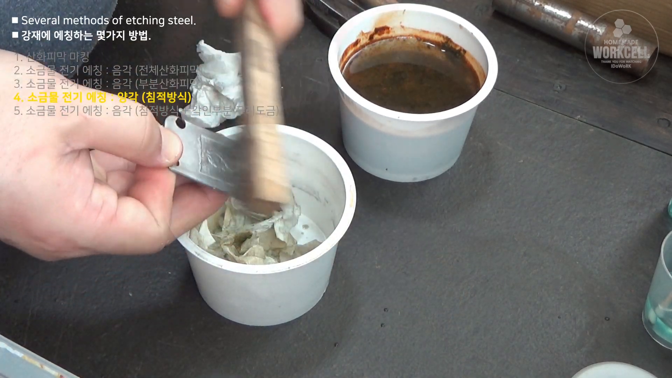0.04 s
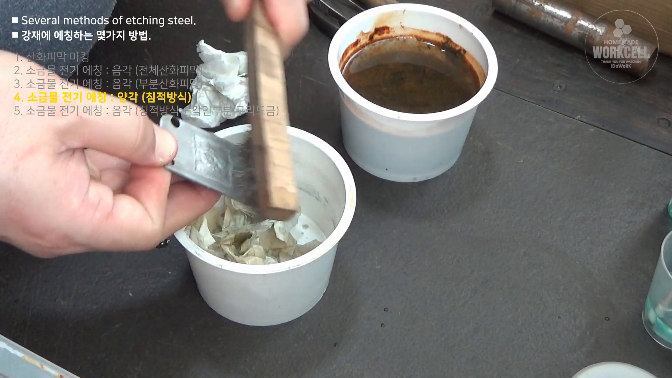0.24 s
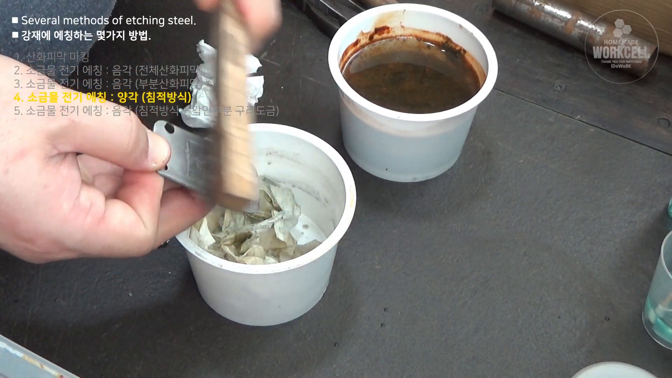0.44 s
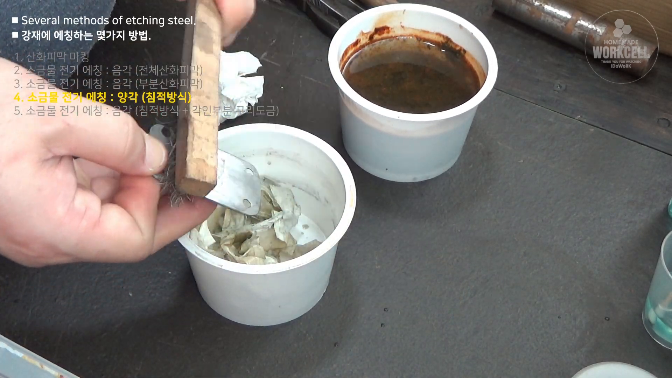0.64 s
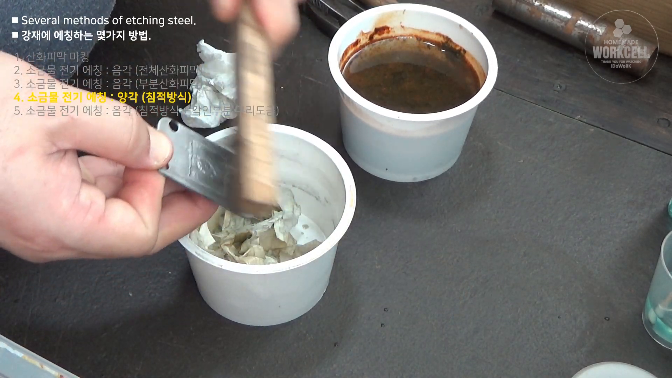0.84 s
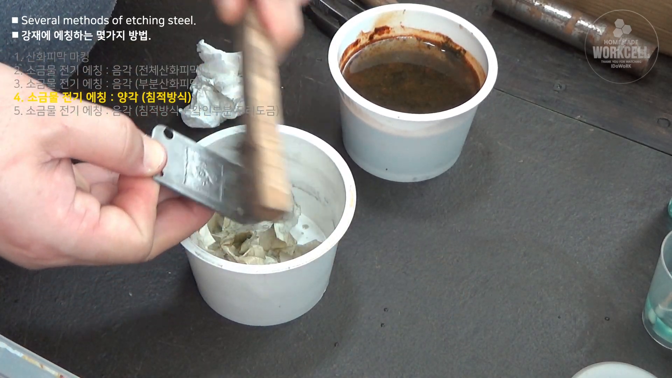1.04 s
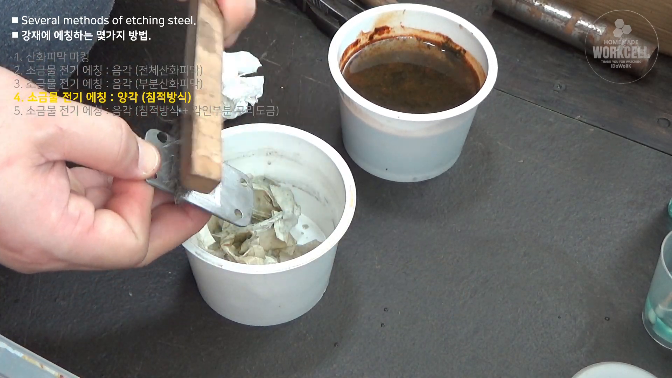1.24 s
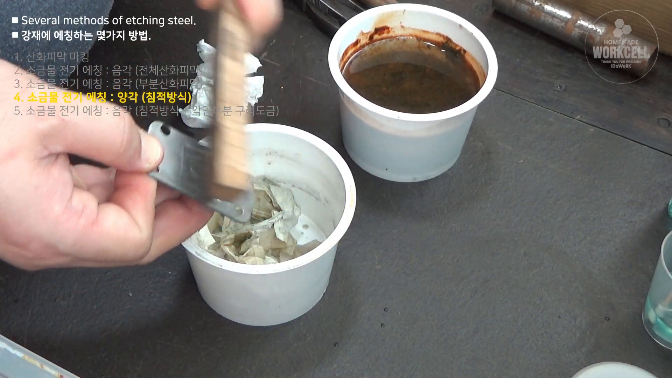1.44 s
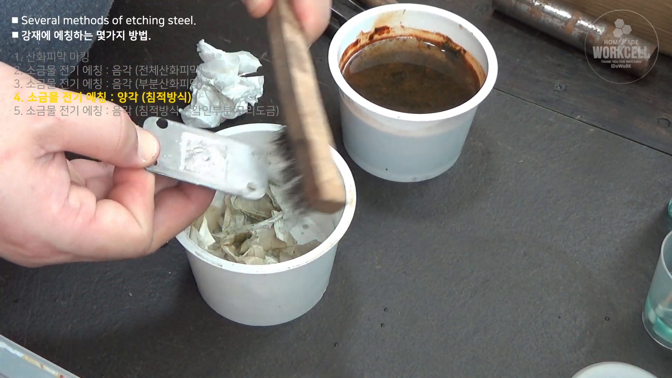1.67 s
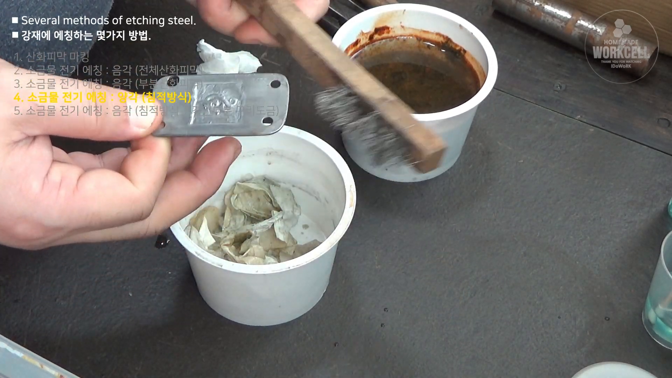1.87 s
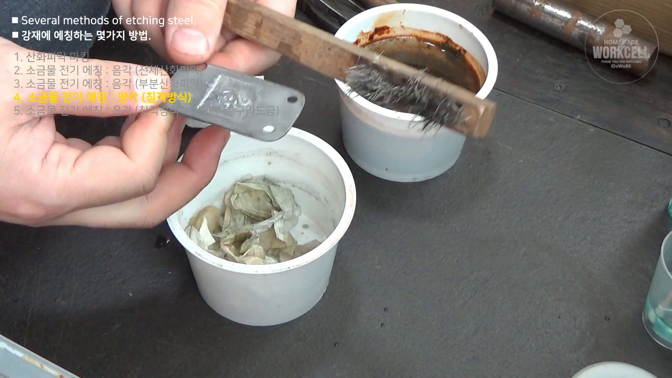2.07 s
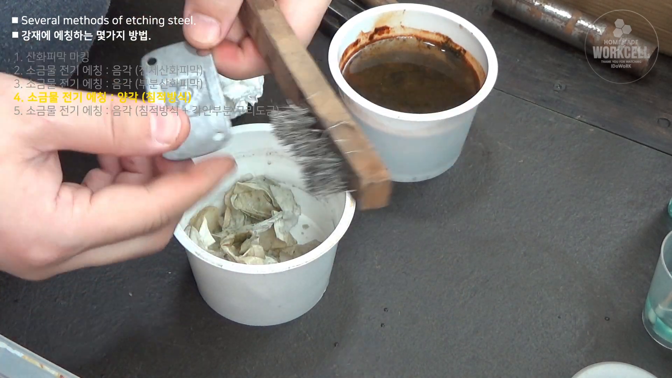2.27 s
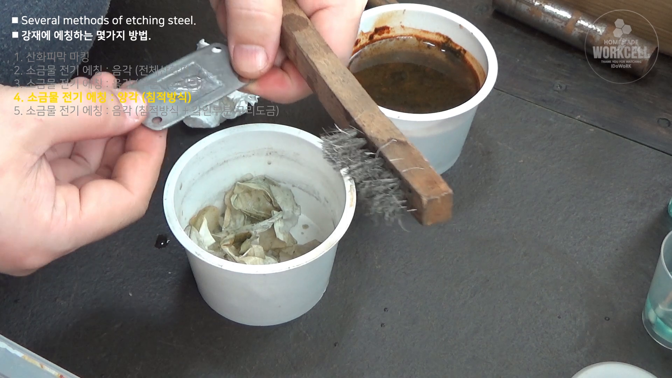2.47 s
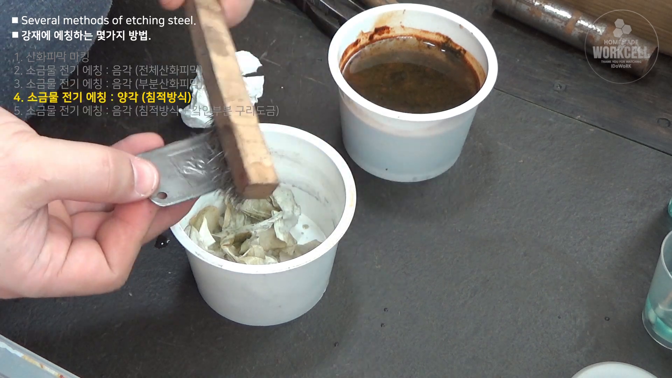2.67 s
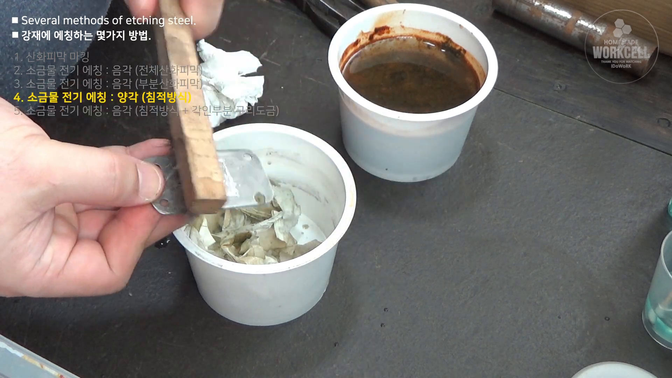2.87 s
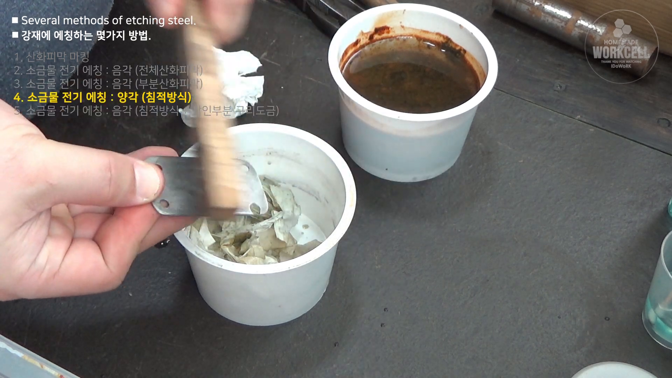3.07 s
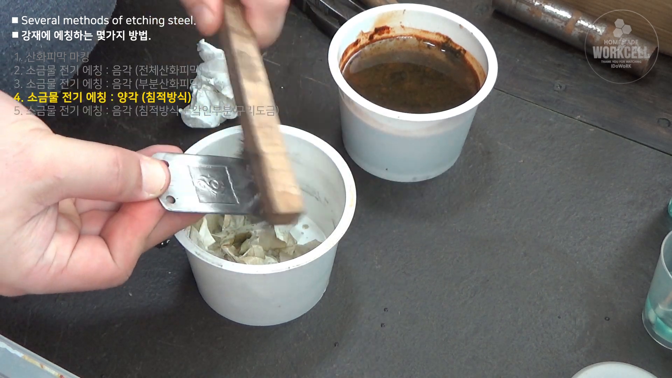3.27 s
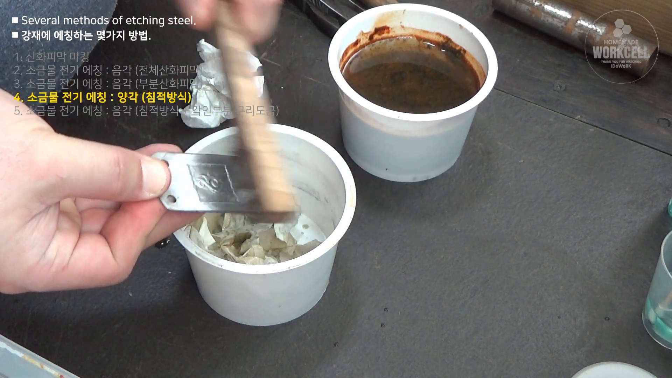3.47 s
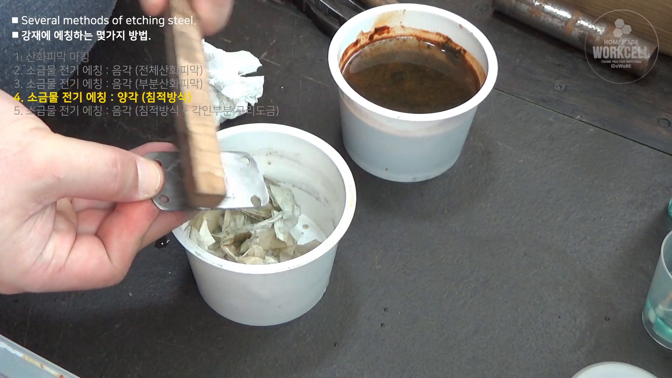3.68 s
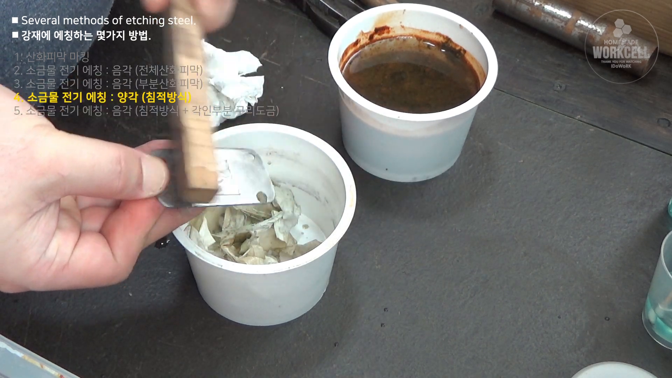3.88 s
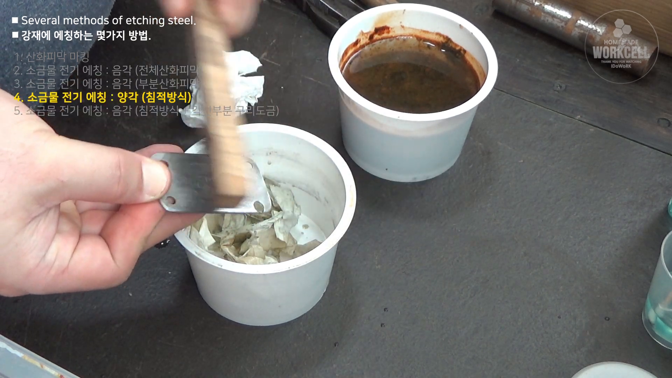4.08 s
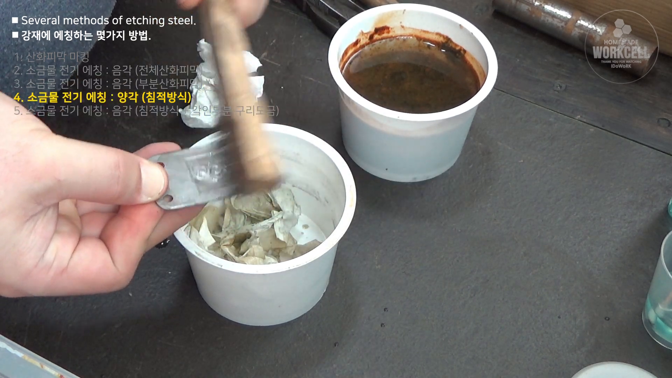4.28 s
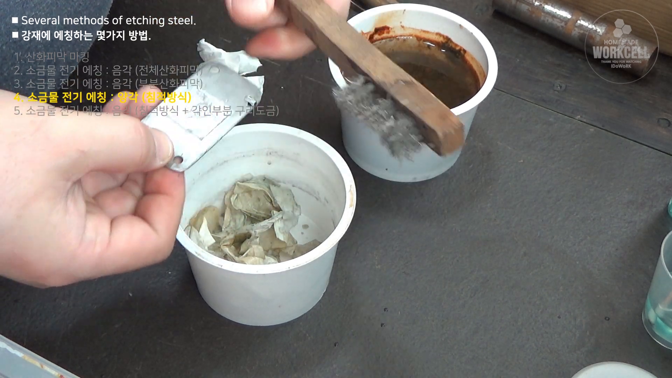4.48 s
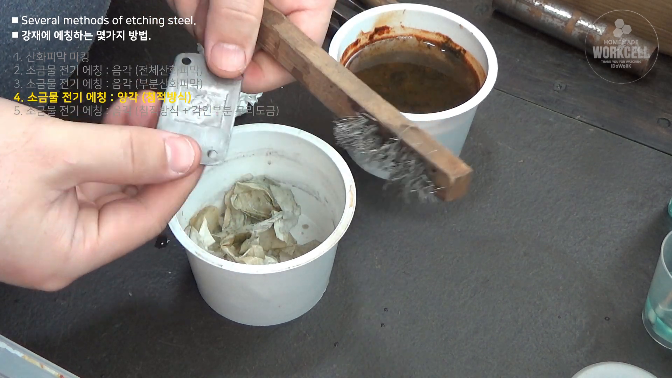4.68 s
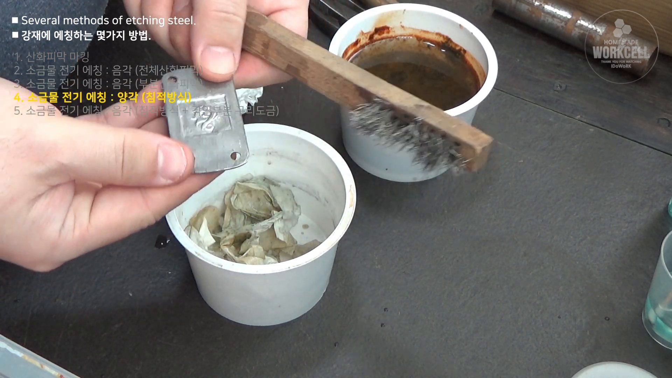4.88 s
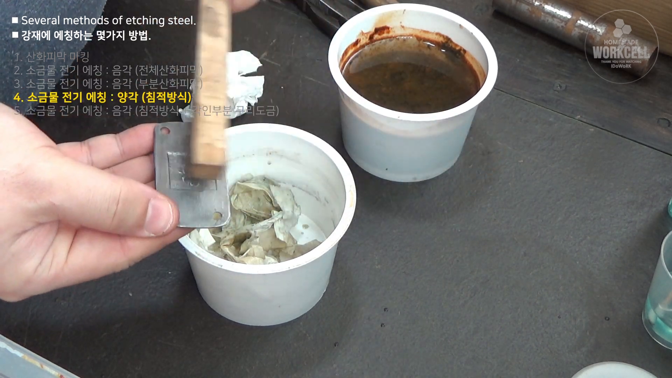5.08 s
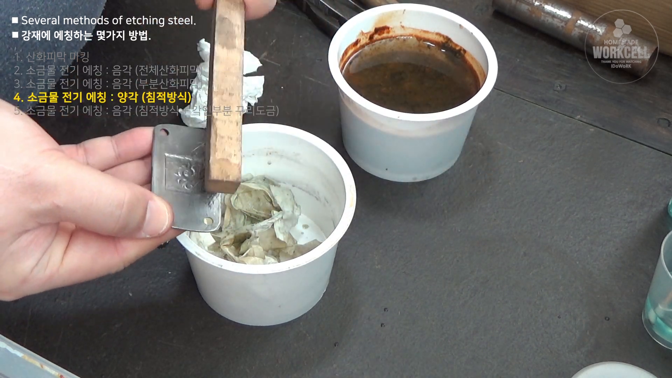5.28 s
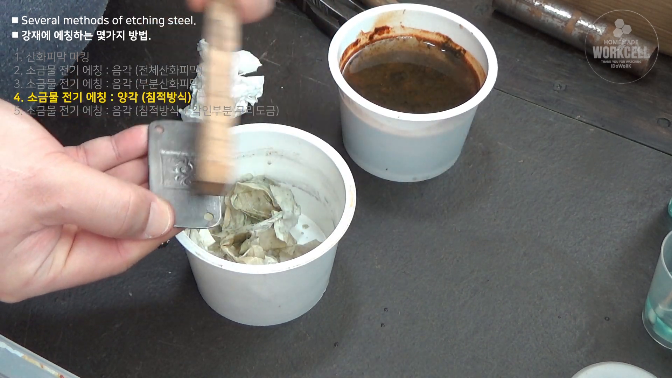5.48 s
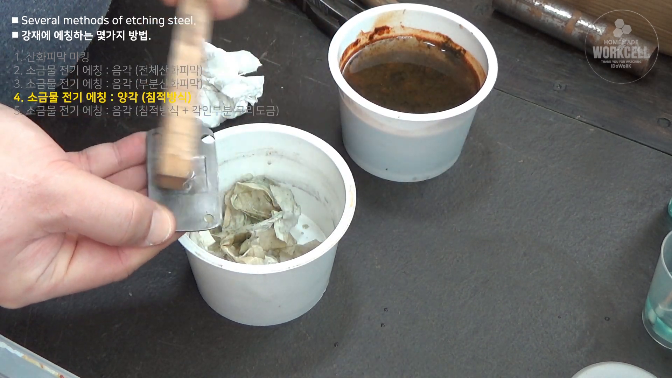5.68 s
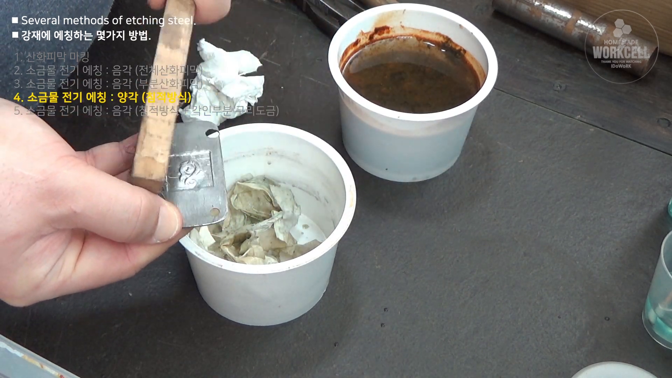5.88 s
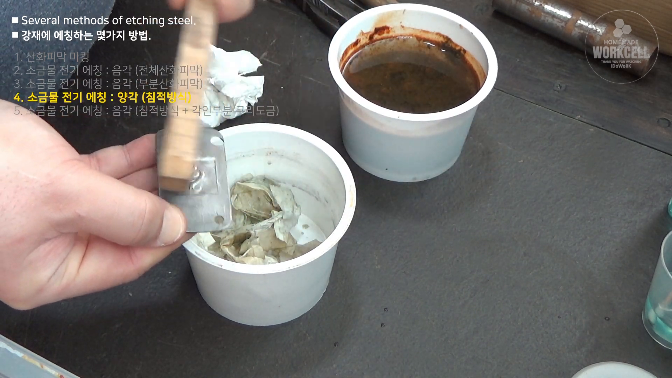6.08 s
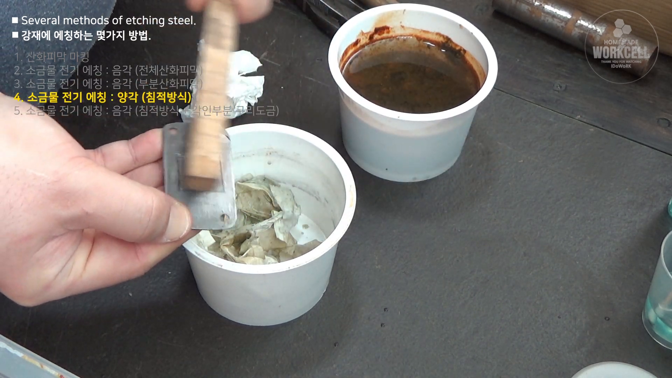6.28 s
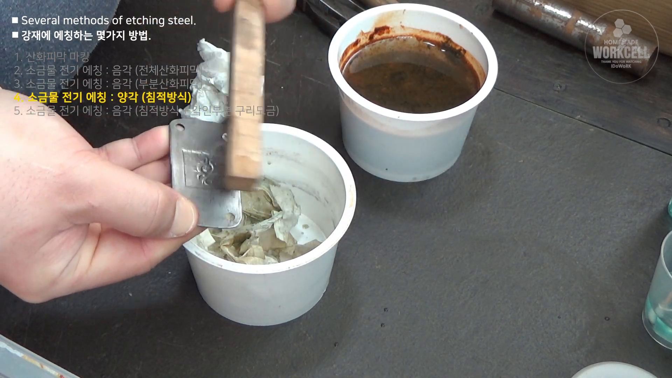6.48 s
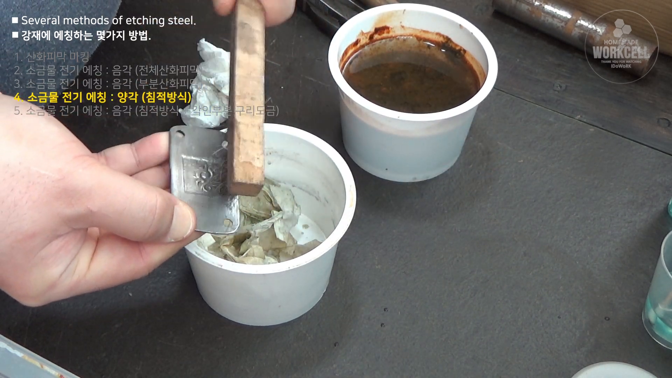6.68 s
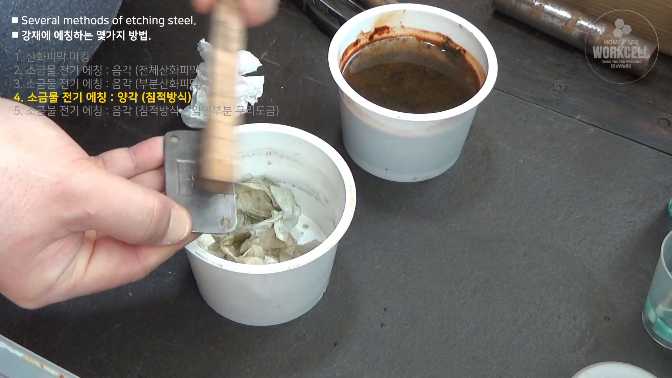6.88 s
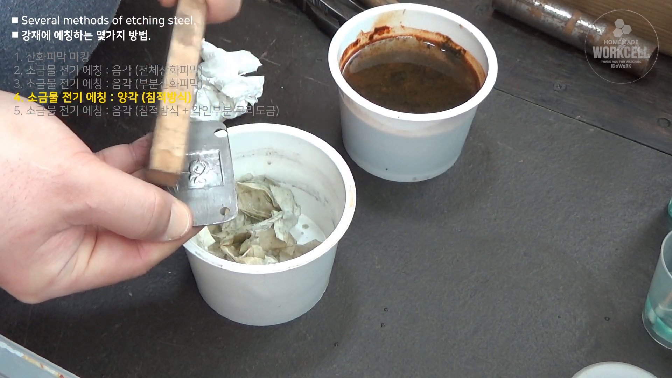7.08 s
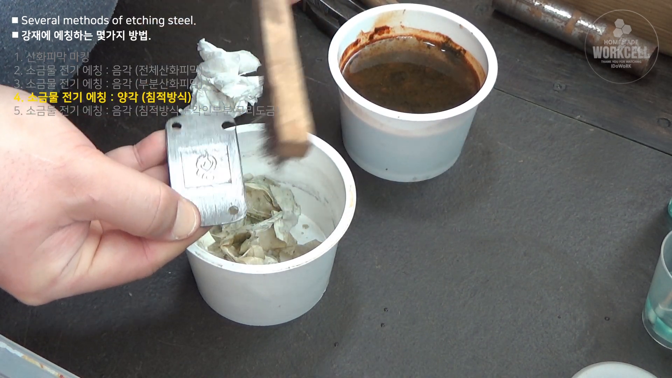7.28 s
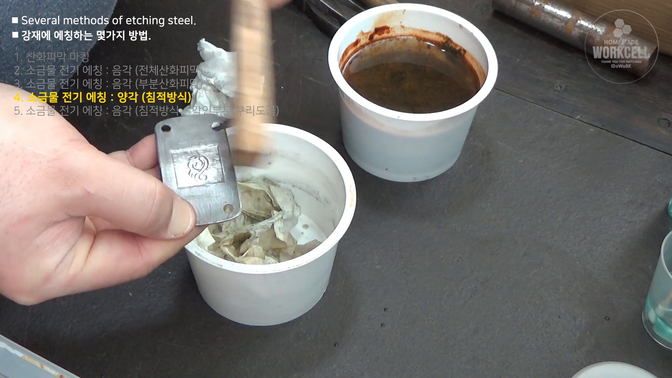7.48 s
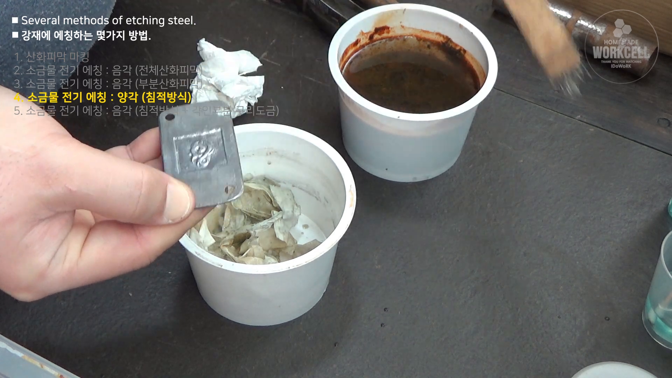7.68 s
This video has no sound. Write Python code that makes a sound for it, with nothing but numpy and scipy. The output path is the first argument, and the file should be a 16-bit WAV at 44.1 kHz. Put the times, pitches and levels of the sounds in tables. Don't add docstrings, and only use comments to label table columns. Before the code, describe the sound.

A wire brush scrubs a small hand-held steel plate in three bouts of fast, bright, scratchy strokes, then two single flicks, over faint fan hum.

```python
import sys
import numpy as np
from scipy import signal
from scipy.io import wavfile
from scipy.ndimage import uniform_filter1d

SR = 44100
rng = np.random.default_rng(int(sys.argv[2]) if len(sys.argv) > 2 else 0)


def ratio(d):
    e = np.asarray(d, float) / 20
    return 10 ** e


def bounce(signal):
    frames = np.transpose(np.atleast_2d(signal))
    limited = np.clip(frames, -1, 1)
    pcm = np.round(limited * 32767).astype(np.int16)
    wavfile.write(sys.argv[1], SR, pcm)


N = 340967
TIME = np.arange(N) / SR

GRIP_CHANGES_S = (2.3, 4.7)
# [start_s, length_s, level_db, swell_db, dull_db]
BOUT_1 = [(0.007, 0.043, -34.5, 11, 0), (0.071, 0.0378, -32.5, 0, -1.0), (0.1317, 0.038, -31, -3.5, -1),
          (0.187, 0.038, -34, 2, 2), (0.253, 0.027, -31.5, -1, 0.5), (0.301, 0.035, -33, 8, 2),
          (0.3645, 0.027, -29.5, -5, 0.5), (0.412, 0.037, -33.5, 1, 1.5), (0.4756, 0.032, -32.5, -5, 0),
          (0.5234, 0.045, -33, 2, 1), (0.59, 0.03, -30, -7.5, -0.5), (0.64, 0.035, -30.5, 1, -0.5),
          (0.7016, 0.036, -32, -10, 2), (0.753, 0.042, -32, 3, 0), (0.818, 0.033, -30.5, -5, 1),
          (0.8694, 0.044, -33, 2, 1.5), (0.9344, 0.033, -32, -3, 0.5), (0.985, 0.039, -31.5, 11, -0.5),
          (1.051, 0.036, -31.5, -9.0, 0), (1.103, 0.039, -33.5, 4, 0.5), (1.1676, 0.04, -33.5, -10, 1),
          (1.224, 0.044, -34.5, 3, 2.5), (1.2893, 0.033, -30.5, -7, -0.5), (1.342, 0.039, -33.5, 0, 3),
          (1.404, 0.035, -30, -2, 1.5), (1.458, 0.038, -32, 5, 0.5), (1.524, 0.035, -31.5, -11, 0),
          (1.576, 0.036, -31.5, -3, 2.5)]
BOUT_2 = [(2.7492, 0.034, -37, 5, 2), (2.8235, 0.041, -34.5, -8, 0), (2.8735, 0.034, -35, -4, 4),
          (2.925, 0.038, -35, -3, -3), (2.9775, 0.037, -39, 9, 2), (3.0371, 0.042, -33.5, 2, 0.5),
          (3.0964, 0.043, -34.5, -5, 2), (3.1557, 0.037, -32.5, 3.5, 0), (3.2141, 0.035, -33.5, -6, 2.5),
          (3.2654, 0.039, -31, 7, 0.5), (3.3221, 0.041, -32.5, -6, 0.5), (3.3804, 0.039, -33.5, -3, 0),
          (3.4401, 0.039, -34.5, -3, 0.5), (3.494, 0.039, -32.5, 0.0, -1),
          (3.5516, 0.038, -32.5, -5.5, 1.5), (3.6058, 0.039, -31, 5.5, 0),
          (3.6622, 0.036, -33.5, -5.5, 1.5), (3.7119, 0.044, -32, 6.5, -0.5), (3.7714, 0.035, -32, 1, 2),
          (3.8187, 0.045, -33.5, 10, -1.5), (3.883, 0.038, -32, -5, -1), (3.9374, 0.036, -31.5, 6.0, 1.5),
          (3.9926, 0.03, -30.5, 0, -1.5), (4.0452, 0.034, -31, 2, 1.0), (4.0959, 0.032, -30.5, 2, -2),
          (4.1521, 0.038, -32.5, -7, -4), (4.207, 0.037, -34, -12.0, -5), (4.2628, 0.047, -37.5, -12, 2)]
BOUT_3 = [(5.1237, 0.025, -33.5, 4, 1.5), (5.179, 0.027, -35.5, 0, 1), (5.2311, 0.027, -32.5, 5, -5),
          (5.2758, 0.028, -36.5, 12, 1), (5.332, 0.027, -29.5, 7, 1), (5.3714, 0.042, -35.5, 10, -2),
          (5.4423, 0.026, -31, 4, 1.5), (5.4899, 0.037, -34, -1, 0.5), (5.5505, 0.031, -32, 8, 0.0),
          (5.5939, 0.035, -35, 14, -2), (5.6589, 0.032, -31.5, 10, 0), (5.721, 0.024, -32.5, -5, 0.5),
          (5.7659, 0.029, -31, 8, 3.5), (5.8078, 0.044, -33, 7, -1.5), (5.873, 0.033, -30, 10, 0.5),
          (5.922, 0.038, -36, 12, -0.5), (5.9895, 0.028, -30.5, 10, 3), (6.0307, 0.038, -34, 7, -3),
          (6.0926, 0.039, -32.5, 4, 1), (6.153, 0.029, -34, -7, 1), (6.1998, 0.033, -31, 5, 1),
          (6.243, 0.036, -33.5, 7, 0.0), (6.3108, 0.028, -31.5, 10, 2), (6.355, 0.041, -35, -2, 0.5),
          (6.4164, 0.032, -32.5, 9.0, 0.5), (6.4705, 0.036, -34, 0, 1), (6.5257, 0.033, -32.5, 10, 2.5),
          (6.5733, 0.04, -35.5, 6, 0), (6.6352, 0.033, -31.5, 9, 0.5), (6.694, 0.026, -32.8, -3, 1.5),
          (6.7457, 0.031, -30.5, 2, 1.5), (6.796, 0.029, -34, -2, 0.0), (6.8499, 0.036, -32.5, 6, 1.5),
          (6.91, 0.037, -35, -4, -1), (6.9651, 0.025, -32, 11, 2), (7.0046, 0.04, -34, 4, 0.5),
          (7.067, 0.04, -30.5, 3, 0.0), (7.1242, 0.027, -31.5, -5, 0.5), (7.179, 0.025, -30.5, 12, 0.0),
          (7.232, 0.057, -35, 9, -1.5)]
# [start_s, length_s, level_db, swell_db]
FLICKS = [
    (1.641, 0.07, -35, -25),
    (2.71, 0.01, -59, -8),
    (7.444, 0.043, -30.5, -5),
    (7.558, 0.034, -31, -1),
]
ARCH_DB = (0.5, 2, 0)
# [push_db, pull_db]
DRAG_DB = [(-18.5, -16.5), (-19.5, -20.5), (-23, -6.5)]
# [touch_s, lift_s]
CONTACT = [
    (0, 1.722),
    (2.707, 2.728),
    (2.744, 4.33),
    (5.104, 7.296),
    (7.432, 7.496),
    (7.551, 7.6),
]
# [time_s, peak_db]
CATCHES = [(0.0209, -21), (0.1371, -19), (0.1524, -19), (0.2014, -22), (0.3804, -20), (0.4728, -23),
           (0.4853, -18), (0.55, -19), (0.601, -18), (0.651, -19), (1.052, -20), (1.1814, -19),
           (1.4032, -18), (1.4845, -18), (1.6402, -18), (2.7854, -26), (2.8374, -21), (2.9317, -19),
           (2.9417, -18), (3.045, -22), (3.049, -19), (3.609, -21), (3.6651, -22), (3.716, -22),
           (3.7823, -20), (3.8214, -23), (3.9933, -20), (4.2144, -20), (5.1257, -23), (5.1642, -24),
           (5.1876, -23), (5.2804, -21), (5.3413, -18), (5.3847, -21), (5.4311, -24), (5.4694, -24),
           (5.5608, -21), (5.8364, -20), (5.9084, -19), (5.9325, -20), (6.0325, -23), (6.158, -19),
           (6.232, -19), (6.323, -21), (6.2148, -19), (6.4298, -20), (6.4454, -21), (6.6644, -19),
           (6.8089, -20), (6.8794, -21), (6.9217, -21), (6.9735, -20), (6.9864, -22), (7.0974, -21),
           (7.1277, -19), (7.1891, -20), (7.2104, -20), (7.2884, -21), (7.452, -19), (7.4704, -20),
           (7.5697, -19)]
# [freq_hz, density_db_per_hz]
SCRAPE = [
    [(2500, -31), (3300, -28), (4500, -22), (5300, -16.5), (7500, -14), (9000, -5), (11500, -1.5),
     (13600, -3), (14800, 17), (16000, -15)],
    [(2500, -25), (3300, -27.5), (4200, -13), (5000, -24), (7000, -9), (9000, -3), (11500, -10),
     (13600, -2.5), (14800, 0), (16000, -5)],
    [(2500, -29.5), (3300, -22.5), (4400, -20), (5200, -16), (8300, -20), (9500, -7), (11500, -1.5),
     (13600, -16), (14800, -10), (16000, -5)],
]
# [freq_hz, width_hz, level_db]
PLATE = [
    [(5246, 170, -12.5), (6970, 150, -12), (9700, 190, -1.5), (11000, 760, -3.5), (12574, 290, 8.5),
     (12770, 400, 6.5)],
    [(5210, 430, -18), (6150, 130, -9), (8440, 200, -27), (9770, 250, 1), (11140, 820, 0), (12670, 260, 8),
     (13060, 330, -8)],
    [(5120, 97, -13.5), (6400, 660, -17), (7630, 530, -14.5), (9970, 940, -5.5), (12400, 300, 0),
     (12610, 260, -0.5), (12730, 330, -8), (14000, 400, -5)],
]
DULL_DB = (-8.5, -10, -12)
RING_DB = (-7.5, -10.5, 2.5)
THRUM_DB = (-21.5, -23, -20.5)
# [time_s, favour_db]
PLACE = [(0, 0.5), (.4, 0), (.8, 2), (1.2, 3.5), (1.7, 2), (2.8, 3), (2.93, -4.5), (3.1, 0.5), (3.3, 3),
         (3.5, 3), (3.7, -0.5), (3.9, 2.5), (4.1, -0.5), (4.25, 0), (5.2, 1.5), (5.7, 0.5), (6.2, 1.0),
         (6.7, 0.5), (7.0, 1), (7.6, 1.5)]
OPEN_TOP_TOUCHES_S = (1.403, 5.105, 7.432, 7.552)
# [time_s, level_db]
ROOM = [(0.0, -51), (0.04, -56.5), (0.36, -54.5), (1.2, -56.5), (1.66, -53.5), (3.03, -58.5), (3.34, -55),
        (3.42, -61), (3.47, -56.5), (4.52, -54.5), (5.19, -56.5), (5.38, -54.5), (6.95, -56), (7.19, -54.5),
        (7.23, -59.5), (7.73, -54.5)]
# [freq_hz, density_db_per_hz]
ROOM_COLOUR = [(30, -45), (60, -62), (120, -15.5), (180, -51), (250, -4), (380, -15.5), (700, -5.5),
               (1000, -2.5), (1700, -3.5), (2750, -2.5), (3400, -10.5), (6700, -15), (16000, -24)]
# [freq_hz, width_hz, level_db]
FAN = [(254, 18.3, 1), (309, 6.3, 7), (437.3, 18.6, -0.5), (467.6, 27, 2), (578.3, 15, 4), (646, 3.6, -0.5),
       (706, 8.3, -34), (1066, 21, -1), (1673, 47, 2.5), (1837, 77, 4), (2452, 15, 2.5), (2718, 28, 1.5)]
# [freq_hz, correlation]
LIKENESS = [(60, 0.99), (130, 1.0), (290, 0.995), (640, 0.93), (1410, 0.84), (3100, 0.4), (6820, 0.55),
            (15000, 0.83)]
# [time_s, peak_db, centre_hz, spread_octaves, t60_s]
TICKS = [(1.715, -36, 10000, 0.64, 0.051), (1.724, -41, 11000, .6, .02), (1.7544, -48, 9100, 0.34, 0.034),
         (1.8078, -48, 8520, .5, 0.04), (1.8991, -46, 13000, .4, .03), (2.383, -55, 10100, .1, .04),
         (2.708, -38, 12000, 0.4, .03), (4.3405, -43, 10100, .5, 0.026), (4.4548, -51, 13100, 0.28, 0.025),
         (5.105, -28, 11580, 0.86, 0.011), (5.108, -35, 11480, .5, .06), (7.432, -31, 11000, .6, 0.045),
         (7.552, -35, 9900, 0.87, 0.098), (7.6334, -52, 11000, .7, .015), (7.7085, -44, 12000, 0.3, .03),
         (7.7214, -41, 12100, .4, .03)]
# [time_s, peak_db, centre_hz, spread_octaves, t60_s]
KNOCKS = [(2.502, -42.5, 1400, 0.4, 0.03), (2.507, -42, 1700, 0.4, 0.055), (2.85, -57, 960, .08, .15),
          (2.89, -59, 820, .05, .16), (2.92, -58, 820, .05, .12), (5.706, -48, 1100, 0.2, 0.1),
          (7.433, -50, 700, .3, .05), (7.553, -51, 700, 0.45, 0.054)]
# [time_s, peak_db, centre_hz, spread_octaves, t60_s]
GRAZES = [(2.708, -43, 12700, .02, .06), (2.718, -40, 12700, .015, .1), (2.718, -48, 9800, .02, .04),
          (2.752, -35, 12700, .02, .12), (2.772, -35, 12650, .02, .12), (2.796, -46, 12700, .015, .15),
          (7.283, -33, 12500, .015, .085), (7.436, -36, 12400, .02, .1)]
# [middle_s, half_length_s, level_db, centre_hz]
RUSTLES = [(1.842, 0.0089, -59, 10500), (1.966, .025, -62, 10700), (2.08, 0.012, -64, 8900),
           (2.625, 0.0091, -63, 11000), (2.655, 0.013, -63, 10500), (4.383, 0.013, -56.5, 10300),
           (4.946, 0.027, -69, 11000), (5.043, 0.013, -62, 10310), (7.694, .04, -61, 9100)]
# [freq_hz, level_db, t60_s, strong_weak_db]
MOTOR = [(4720, -8, 0.008, 2.5), (5060, -5, 0.0076, 2.5), (6290, -2.5, 0.0065, 3.0),
         (6910, -7.5, 0.011, 0.3)]
# [time_s, level_db]
MOTOR_LEVEL = [(1.9, -61), (2.7, -64.5), (4.3, -60.5), (5.1, -66), (7.7, -65)]
# [time_s, gain_db]
MOTOR_TOP = [(1.9, -1.5), (4.35, -1.5), (4.6, 3), (4.95, 1), (5.1, 8), (7.7, 0.5)]
# [time_s, level_db]
MOTOR_JOLTS = [
    (1.9215, -47),
    (1.936, -57),
]
# [time_s, freq_hz, level_db]
WHINE = [(3.6, 637, -73), (3.8, 647, -64), (4.1, 662, -80), (4.25, 689, -74), (4.7, 701, -63.5),
         (5.1, 706, -72), (5.3, 704, -93)]


def rms_one(x):
    return x / np.sqrt(np.mean(x ** 2) + 1e-20)


def at_hz(points, hz):
    points_hz, values = np.transpose(points)
    return np.interp(np.log(hz), np.log(points_hz), values)


def drift(rate_hz):
    r = np.exp(-40 * np.pi * rate_hz / SR)
    noise = rng.standard_normal(N // 20 + 2002)
    slow = signal.lfilter([1], [1, -2 * r, r * r], noise)[2000:]
    return np.interp(np.arange(N) / 20, np.arange(len(slow)), rms_one(slow))


def resonance(x, hz, width_hz):
    r = np.exp(-np.pi * width_hz / SR)
    poles = [1, -2 * r * np.cos(2 * np.pi * hz / SR), r * r]
    return signal.lfilter(np.array([1, 0, -1]) * (1 - r * r) / 2, poles, x)


def ring(clicks, hz, t60_s):
    r = ratio(-60 / (t60_s * SR))
    w = 2 * np.pi * hz / SR
    return signal.lfilter([0, np.sin(w)], [1, -2 * r * np.cos(w), r * r], clicks + 1e-18)


def band(x, low_hz, high_hz):
    edges_hz = [low_hz, min(high_hz, .45 * SR)]
    return signal.sosfilt(signal.butter(2, edges_hz, "band", fs=SR, output="sos"), x)


def clicks_at(rows):
    out = np.zeros(N)
    out[[round(row[0] * SR) for row in rows]] = ratio(np.array([row[1] for row in rows]))
    return out


def grains(per_s, spread_db, hiss, bunch_db):
    sizes = ratio(spread_db * np.minimum(rng.exponential(1, N), 3)) * rng.choice([-1, 1], N)
    slips = rms_one(sizes * (rng.random(N) < per_s / SR)) + hiss * rng.standard_normal(N)
    slips = slips * ratio(bunch_db * drift(130))
    return slips / np.sqrt(uniform_filter1d(slips ** 2, size=600))


def strokes():
    rows = [(*flick, 0, 3.0, -17) for flick in FLICKS]
    for bout, arch_db, drag_db in zip((BOUT_1, BOUT_2, BOUT_3), ARCH_DB, DRAG_DB):
        rows += [(*stroke, arch_db, drag_db[k % 2]) for k, stroke in enumerate(bout)]
    return rows


def stroke_pressure(rise_s, fall_s, linger_s):
    pressure = np.zeros((2, N))
    for start_s, length_s, db, swell_db, dull_db, arch_db, drag_db in strokes():
        first = max(round((start_s - .04) * SR), 0)
        near = slice(first, round((start_s + length_s + .04) * SR))
        t = TIME[near] - start_s
        along = np.clip(t / length_s, 0, 1) - .5
        edges = 1 / (1 + np.exp(-t / rise_s)) / (1 + np.exp((t - length_s) / fall_s))
        arch = ratio(swell_db * along - arch_db * (2 * along) ** 2)
        off_middle = (t - length_s / 2) / (length_s / 2 + linger_s)
        drag = ratio(drag_db) * np.exp(-.5 * off_middle ** 4)
        pressure[:, near] += ratio(db) * (edges * arch + drag) * ratio([[0], [dull_db]])
    return pressure


def touching():
    on = np.searchsorted(np.ravel(CONTACT), TIME, "right") % 2
    return uniform_filter1d(1.0 * on, size=160)


def scrape(slips, drags, grip):
    out = 0
    edges_hz = 2400 * 2 ** np.arange(0, 2.9, .2)
    dull_db = np.array(DULL_DB)[grip]
    for k, (low, high) in enumerate(zip(edges_hz, edges_hz[1:])):
        hz = np.sqrt(low * high)
        colour_db = np.array([at_hz(points, hz) for points in SCRAPE])[grip]
        dull_share = np.clip(np.log2(9500 / hz) * 2, 0, 1)
        waver_db = (2.0 - 1.3 * dull_share) * drift(28)
        source = (drags if hz < 7000 else slips)[[k % 2, 3]]
        gain = ratio(colour_db + dull_share * (dull_db + 13.5) + waver_db)
        out = out + gain * band(source, low, high)
    return out


def plate_ring(slips, pressure, grip):
    out = np.zeros((2, N))
    detune = .006
    place_db = np.interp(TIME, *np.transpose(PLACE))
    pressed = slips * (pressure / ratio(-34)) ** .25
    for g, modes in enumerate(PLATE):
        held = grip == g
        for k, (hz, width_hz, db) in enumerate(modes):
            main = 12000 < hz < 13000
            drive = ratio(RING_DB[g] + 4) * pressed[2:, held] if main else slips[2:, held]
            wander_db = 2 if main else 3.8
            favour = 1 if main else -1 if hz > 9000 else 0
            damped_hz = max(.65 * width_hz, hz / 70)
            for pulled_hz in (hz * (1 - detune), hz * (1 + detune)):
                wander = ratio(wander_db * drift(16)[held] + place_db[held] * favour)
                mode = resonance(drive * wander + 1e-18, pulled_hz, damped_hz)
                out[:, held] += (-1) ** k * ratio(db - 1) * mode
    return out


def brush():
    pressure, heel = stroke_pressure(rise_s=0.0026, fall_s=0.0018, linger_s=0.021) * touching()
    grip = np.searchsorted(GRIP_CHANGES_S, TIME)
    release = np.convolve(clicks_at(CATCHES), np.exp(-np.arange(200) / 20))[:N]
    snap = release * rng.choice([-1, 1], (4, N))
    tips = np.array([grains(per_s=4000, spread_db=4.5, hiss=0.7, bunch_db=1.6) for _ in range(4)])
    slips = pressure * tips + ratio(-2.5) * snap
    lingering = .5 * heel + .5 * uniform_filter1d(heel, size=1300)
    drags = lingering * tips + ratio(-10) * snap
    mid, side = ratio(3.5) * (scrape(slips, drags, grip) + plate_ring(slips, pressure, grip))
    side = signal.lfilter([.75, -.2], [1], side)
    shake = signal.lfilter([.05], [1, -.95], slips[1] + 0.053 * slips[0] * [[1], [-1]])
    thrum = ratio(np.array(THRUM_DB)[grip]) * shake
    dull = signal.sosfilt(signal.butter(1, 5500, fs=SR, output="sos"), [mid, side])
    lean = 0.097 * mid - 0.2 * dull[0]
    width = lean + ratio(-14.0) * side + 0.19 * dull[1]
    return mid + width * [[1], [-1]] + thrum * ratio([[.2], [-.2]])


def stereo(mid, side, hz):
    alike = np.clip(at_hz(LIKENESS, hz), -1, 1)
    return np.sqrt(1 + alike) * mid + np.sqrt(1 - alike) * side * [[1], [-1]]


def room_tone():
    out = 0
    edges_hz = 25 * 2 ** np.arange(0, 9.7, .4)
    white, together = rng.standard_normal((3, 2, N)), drift(6.8)
    for k, (low, high) in enumerate(zip(edges_hz, edges_hz[1:])):
        mid, side = band(white[k % 2], low, high)
        hz = np.sqrt(low * high)
        own_db, shared_db = (.9, .7) if hz < 3000 else (.2, .3)
        gain = ratio(at_hz(ROOM_COLOUR, hz) + own_db * drift(3.6) + shared_db * together)
        out = out + gain * stereo(mid, side, hz)
    for hz, width_hz, db in FAN:
        mid, side = resonance(white[2], hz, width_hz)
        waver_db = .7 * together + .4 * drift(3)
        out = out + ratio(db - 3.0 + waver_db) * stereo(mid, side, hz)
    return ratio(np.interp(TIME, *np.transpose(ROOM)) + 1.5) * rms_one(out)


def workshop(x, t60_s):
    tail = rng.standard_normal((2, SR // 4)) * ratio(-60 * TIME[:SR // 4] / t60_s)
    tail[:, :SR // 300] = 0
    return signal.fftconvolve(x, tail / np.sqrt(np.sum(tail ** 2) / 2), axes=1)[:, :N]


def handling():
    out = np.zeros(N)
    t = TIME[:SR // 6]
    for time_s, db, hz, spread, t60_s in TICKS + KNOCKS + GRAZES:
        spread = max(spread, .012)
        burst = rng.standard_normal(len(t)) * ratio(-60 * t / max(t60_s, .003))
        sound = band(burst, hz * 2 ** -spread, hz * 2 ** spread)
        at = round(time_s * SR)
        out[at:at + len(sound)] += (ratio(db) * sound / np.abs(sound).max())[:N - at]
    skin = grains(per_s=1500, spread_db=4, hiss=.8, bunch_db=3.0)
    for middle_s, half_s, db, hz in RUSTLES:
        near = slice(round((middle_s - .12) * SR), round((middle_s + 0.13) * SR))
        swell = np.exp(-.5 * ((TIME[near] - middle_s) / half_s) ** 2)
        out[near] += ratio(db + 4.5) * band(skin[near] * swell, hz * 0.67, hz * 1.5)
    return out


def motor():
    start_s, steps_per_s = 1.9471, 52.174
    steps_s = np.arange(start_s, N / SR - .01, 1 / steps_per_s)
    level_db = np.interp(steps_s, *np.transpose(MOTOR_LEVEL))
    turn = (-1) ** np.arange(len(steps_s))
    out = 0
    for hz, db, t60_s, turn_db in MOTOR:
        swell_db = np.interp(steps_s, *np.transpose(MOTOR_TOP)) * (hz == MOTOR[-1][0])
        chance_db = 1.5 * rng.standard_normal(len(steps_s))
        step_db = level_db + turn_db * turn + swell_db + chance_db
        taps = clicks_at(list(zip(steps_s, step_db)) + MOTOR_JOLTS)
        once = ring(taps, hz, t60_s) * 60 / (t60_s * SR)
        out = out + ratio(db + 2.5) * ring(once, hz, t60_s)
    return np.array([out, np.roll(out, 1)])


def whine():
    time_s, hz, db = np.transpose(WHINE)
    phase = 2 * np.pi * np.cumsum(np.interp(TIME, time_s, hz) + 6.7 * drift(8.4)) / SR
    return ratio(np.interp(TIME, time_s, db) - 2.5 + 5 * drift(9)) * np.sin(phase)


def scene():
    near = brush() + handling() * ratio([[.6], [-.6]])
    echo = ratio(-17) * workshop(near, t60_s=.1)
    wind_filter = signal.butter(2, 75, "high", fs=SR, output="sos")
    far = signal.sosfilt(wind_filter, room_tone() + whine())
    return near + echo + motor() + far


def roll_off(x):
    return signal.sosfilt(signal.butter(12, 17040, fs=SR, output="sos"), x)


def record(dry):
    rounded = .17 * np.tanh(dry / .17)
    low_pass = signal.firwin(801, 15760, window=("kaiser", 8), fs=SR)
    cut = signal.fftconvolve(rounded, low_pass[None], "same")
    opened = sum(np.exp(-.5 * ((TIME - s - .002) / .002) ** 2) for s in OPEN_TOP_TOUCHES_S)
    mix = cut + ratio(-13) * opened * (rounded - cut)
    return roll_off(mix)


dry = scene()
out = record(dry)
bounce(out)
```